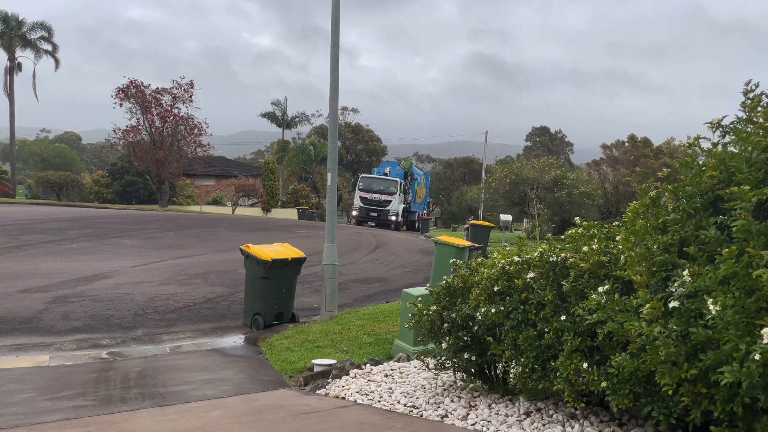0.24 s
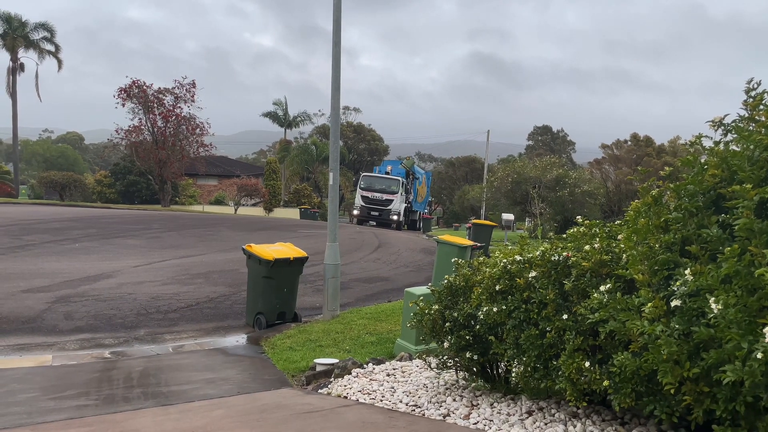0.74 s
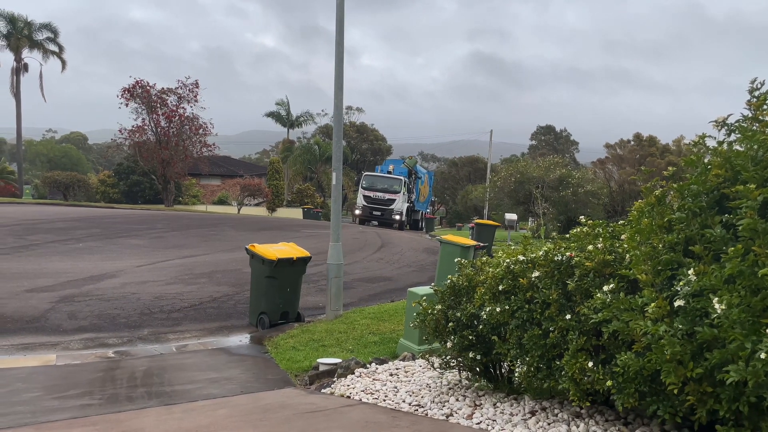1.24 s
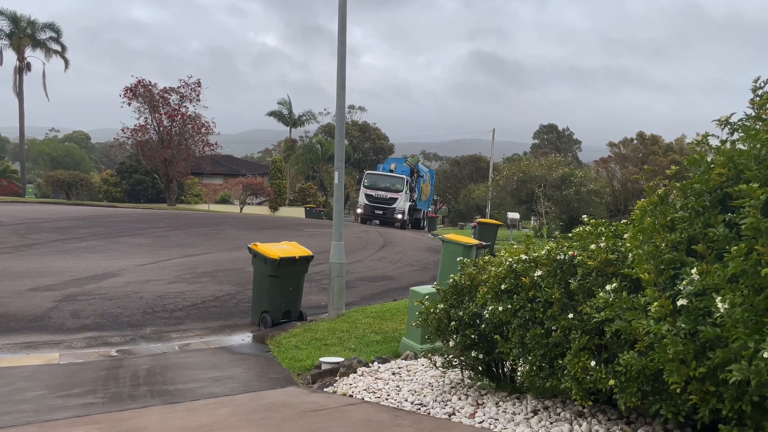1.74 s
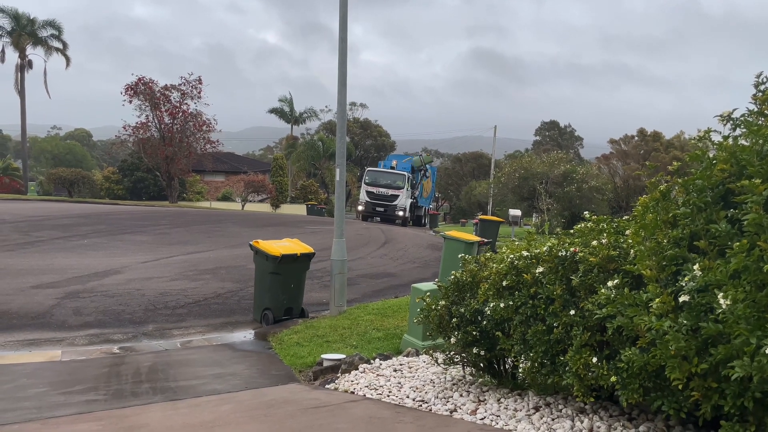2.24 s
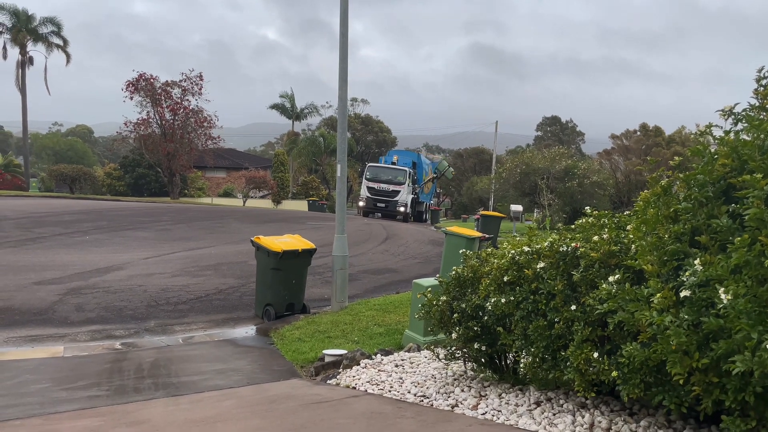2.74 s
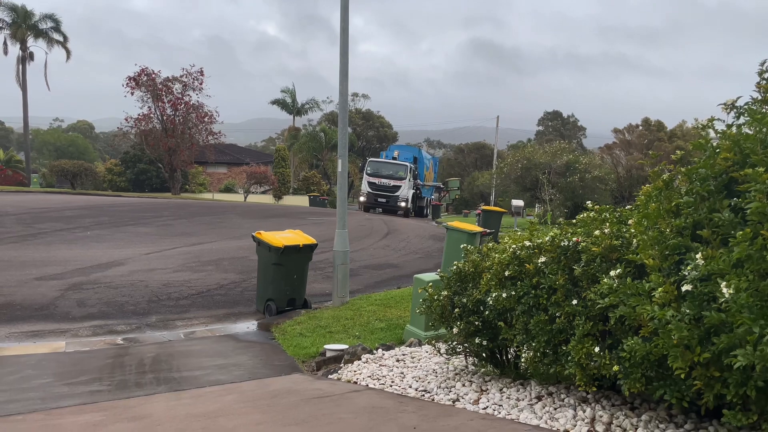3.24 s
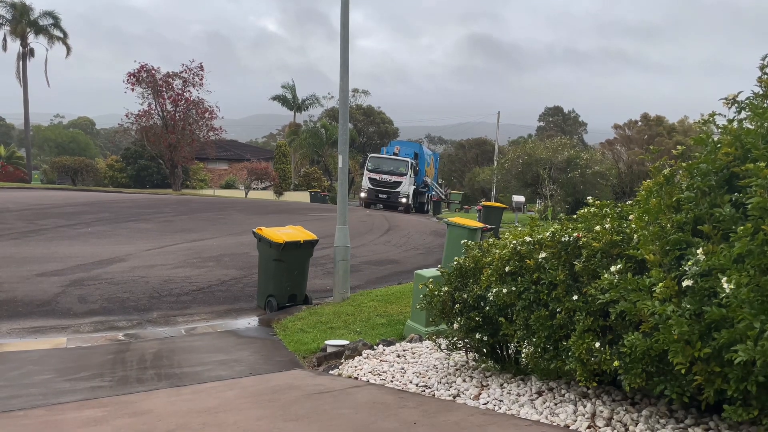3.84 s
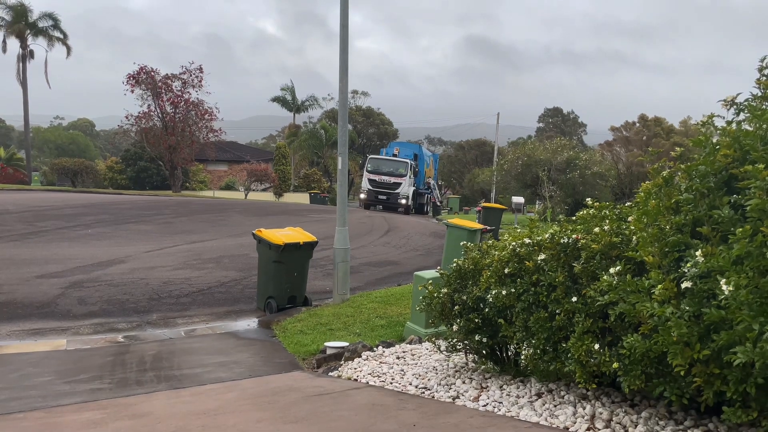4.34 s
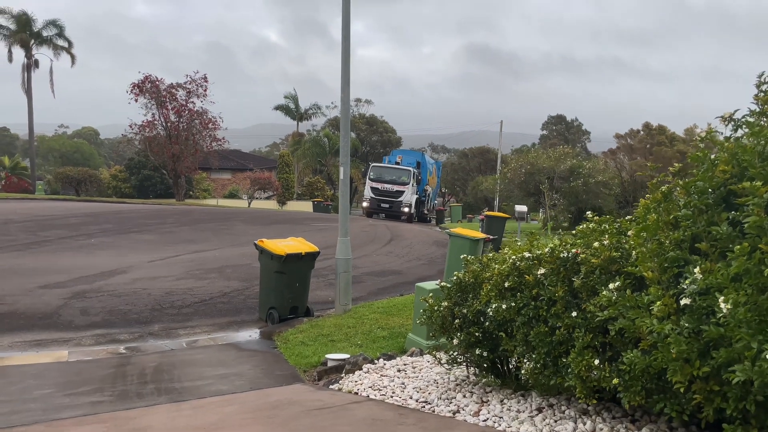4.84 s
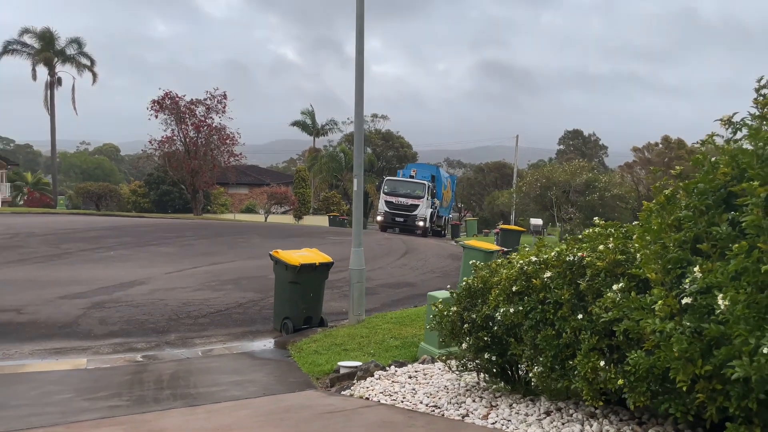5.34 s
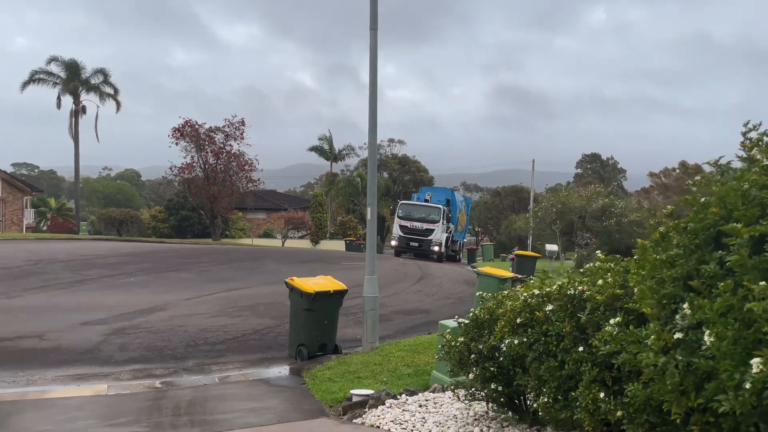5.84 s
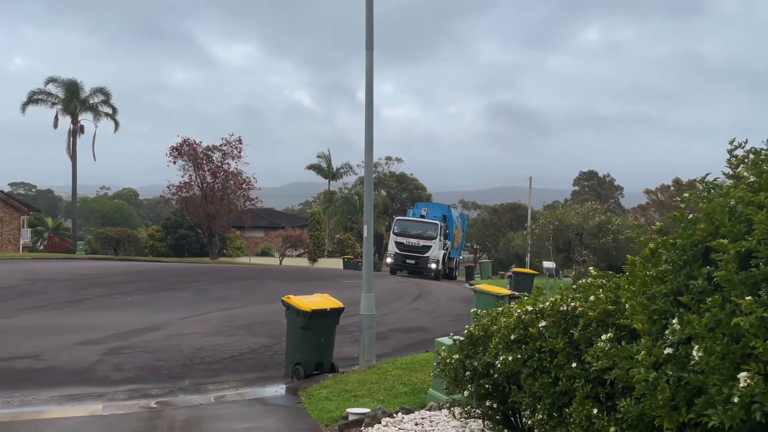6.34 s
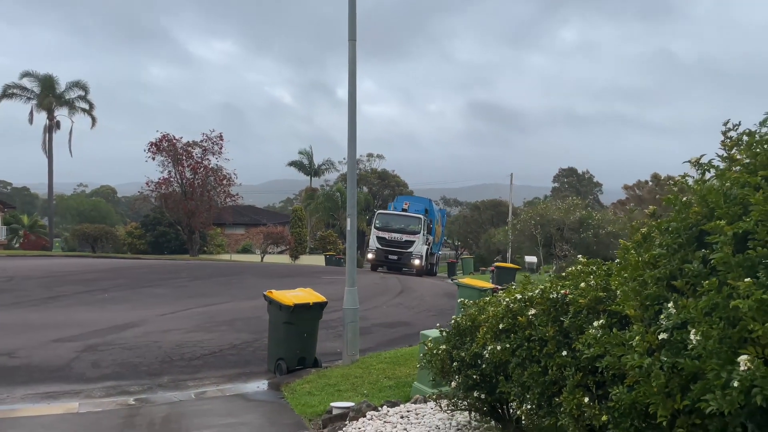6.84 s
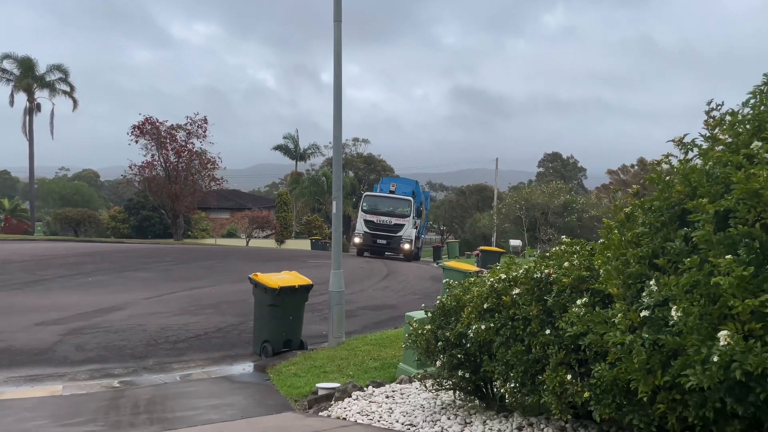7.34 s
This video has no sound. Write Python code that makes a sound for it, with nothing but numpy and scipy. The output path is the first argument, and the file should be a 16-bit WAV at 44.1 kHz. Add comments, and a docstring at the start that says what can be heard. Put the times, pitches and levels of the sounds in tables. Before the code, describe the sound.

A six-cylinder diesel truck slows to a rough idle, metal arm rattling and knocking against a bin with a high dry squeal around one second. A low hydraulic drone runs under the idle for three seconds, then thuds mark the end of the lift. Revs climb steadily, louder and harsher, with thin gear whines and wet tyre hiss, as a bird chirps rapidly. Phone microphone in open air by houses.

```python
"""A damp street with houses: a six-cylinder diesel refuse truck drops to idle, its arm clanks, squeaks and drives
the hydraulic pump, then it pulls away with rising revs while a bird calls. Beating noise makes the engine, sines
its firing orders, pump and whines, decaying noise and modes the knocks, gliding sines the bird.
A phone with two ports listens near a house wall."""
import sys
import numpy as np
from scipy import signal
from scipy.fft import rfft, irfft, next_fast_len
from scipy.io import wavfile
from scipy.ndimage import uniform_filter1d, map_coordinates

SR = 44100
rng = np.random.default_rng(int(sys.argv[2]) if len(sys.argv) > 2 else 0)


def to_wav(sig):
    """Store sig (one row per channel, or 1-D mono) as 16-bit WAV at the path in sys.argv[1].

    Samples outside -1..1 are clipped; the rate is SR.
    """
    pcm = np.clip(np.atleast_2d(sig), -1, 1) * 32767
    pcm = np.round(pcm).astype(np.int16)
    wavfile.write(sys.argv[1], SR, pcm.T)  # frames by channels


N = 335160

# Engine speed. Each row: time in s, firings per s.
FIRING = [(0, 59.5), (.2, 57.5), (.42, 46), (.75, 42.3), (1.4, 42.8), (4.08, 42.5), (4.4, 55.3), (4.57, 59),
          (4.82, 63), (5.06, 66.2), (5.9, 78.5), (6.1, 78), (6.5, 78.4), (6.75, 80), (7.3, 85.2),
          (7.6, 87.3)]
# Effort and nearness. Each row: time in s, exhaust roar in dB, air rush in dB,
# exhaust note over its mean in dB, block clatter in dB.
ROAR = [(0, -29, -42, -1, -33), (.21, -33, -43.5, 0.5, -37), (.36, -32, -46, -3.5, -37),
        (.78, -33.5, -43, 1.5, -36), (1.29, -37, -45, 4.5, -36.5), (2.1, -38.5, -48.5, 3.5, -38.5),
        (2.77, -36.5, -48, 3.5, -38), (4.09, -36, -46, 2.5, -38), (4.32, -32, -42.5, 1.5, -33.5),
        (4.89, -28.5, -40.5, -1, -35), (5.33, -27, -37.5, -1, -34.5), (5.7, -26.5, -37.5, -2.5, -35.5),
        (5.9, -25.5, -35.5, 0.5, -34.5), (6.2, -24.5, -37.5, -1, -33.5), (6.77, -24, -35, -0.5, -34.5),
        (7.03, -22, -36.5, 1, -32.5), (7.47, -20, -35.5, -3, -30.5), (7.6, -21, -36.5, 3, -31)]
# Arm and bin contacts. Each row: start in s, drive to frame in dB, to small steel in dB, to bin in dB,
# time for the rattle to fall 24 dB in s, frequency near which the frame is struck in Hz.
CONTACTS = [(.358, -37, -50, -47, .02, 1080), (.37, -34, -44, -31, 0.04, 1290),
            (0.467, -41, -50, -37, 0.06, 1620), (.533, -46, -44, -50, .012, 2190),
            (0.582, -40, -56, -22, 0.024, 1620), (.6, -42, -59, -20, .1, 1105),
            (.674, -58, -53, -26, .037, 2570), (0.839, -46, -36, -30, 0.07, 1090),
            (.848, -38, -34, -40, .05, 2170), (0.854, -28, -31, -21, 0.091, 1550),
            (.91, -42, -38.5, -25, 0.13, 2190), (1.322, -52, -43, -35, .09, 2540),
            (1.672, -43, -44.5, -48, 0.2, 2500), (3.35, -48, -46, -45, 0.13, 2200),
            (4.147, -34.5, -58, -28, 0.073, 1610), (4.258, -45, -54, -29.5, .1, 1105)]
# Arm frame modes. Each row: centre in Hz, width in Hz, gain of each of two passes in dB.
FRAME_MODES = [(1078, 340, 3), (1310, 77, 8), (1638, 390, 4.5), (2170, 300, 4.5), (2610, 260, 2.5)]


def amp(db):
    """Amplitude factor of a level in dB."""
    return 10 ** (np.asarray(db) / 20)


def unit(x):
    """x scaled to rms 1."""
    return x / np.sqrt(np.mean(x ** 2) + 1e-20)


def along(points, hz):
    """Columns of (Hz, value, ..) points on a log axis."""
    f, *cols = np.transpose(points)
    return np.squeeze([np.interp(np.log(hz + 1), np.log(f + 1), c) for c in cols])


def curves(rows):
    """One value per sample for each column after the time."""
    s, *cols = np.transpose(rows)
    return [np.interp(np.arange(N) / SR, s, c) for c in cols]


def wobble(rate, size=N):
    """A smooth random curve, rate knots a second."""
    at = np.arange(0, size + 8, 8)
    knots = rng.standard_normal(int(size * rate / SR) + 4)
    return np.interp(np.arange(size), at, map_coordinates(knots, [at * rate / SR]))


def gate(start, end, edge):
    """Opens at start, shuts at end, each over edge seconds."""
    s = np.arange(N) / SR
    return np.clip(np.minimum(s - start, end - s) / edge, 0, 1)


def add(track, s, sound):
    """Mixes a short sound in at time s."""
    part = track[round(s * SR):][:len(sound)]
    part += sound[:len(part)]


def filtered(x, response):
    """x times a complex response of frequency."""
    m = next_fast_len(x.shape[-1] + SR // 4)
    spectrum = rfft(x, m) * response(np.fft.rfftfreq(m, 1 / SR))
    return irfft(spectrum, m)[..., :x.shape[-1]]


def resonances(modes):
    """Response of a body with (Hz, width Hz, dB) modes of alternating sign."""
    def response(f):
        return sum((-1) ** k * amp(db) * 1j * f * w / (c * c - f * f + 1j * f * w)
                   for k, (c, w, db) in enumerate(modes))
    return response


def through_body(x, modes):
    """x after two passes through the modes."""
    return filtered(x, lambda f: resonances(modes)(f) ** 2)


def shaped(x, points):
    """x with a spectrum through (Hz, dB) points."""
    return filtered(x, lambda f: amp(along(points, f)))


def noise(patchy_db):
    """White noise with drifting patches of gain, as gusty air makes of a far sound."""
    z = signal.stft(rng.standard_normal(N), nperseg=512)[2]
    across_hz = uniform_filter1d(rng.standard_normal(z.shape), 5, axis=0)
    field = uniform_filter1d(across_hz, 12, axis=1)
    return signal.istft(z * amp(patchy_db * unit(field)), nperseg=512)[1][:N]


def glides(rows, edge):
    """Sliding sines with soft ends: rows of (s, from Hz, to Hz, length s, dB)."""
    out = np.zeros(N)
    for s, from_hz, to_hz, length, db in rows:
        u = np.linspace(0, 1, round(length * SR))
        shape = np.clip(np.minimum(u, 1 - u) / edge, 0, 1)
        hz = from_hz + (to_hz - from_hz) * u
        add(out, s, np.sqrt(2) * amp(db) * shape * np.sin(2 * np.pi * np.cumsum(hz) / SR))
    return out


def blurred(hz, width_hz, size=N, steady=0):
    """A tone smeared into a narrow band of noise round a steady core, rms 1."""
    turn = 2 * np.pi * np.cumsum(hz * np.ones(size)) / SR
    in_phase = (steady + wobble(width_hz, size=size)) * np.sin(turn)
    return unit(in_phase + wobble(width_hz, size=size) * np.cos(turn))


def bird():
    """Each syllable is a thin rising whistle that swells in a slur and a higher flick."""
    # Each row: slur start in s, slur level in dB, flick level in dB.
    syllables = [(5.928, -44, -28), (6.048, -36, -40), (6.151, -38, -36), (6.27, -35, -40),
                 (6.393, -33, -42), (6.514, -29.5, -38), (6.638, -33, -42), (6.763, -30, -41),
                 (6.893, -32, -46), (7.021, -29, -44), (7.148, -30, -43), (7.276, -27, -39),
                 (7.408, -31, -41), (7.54, -31, -46)]
    # from Hz, to Hz, length s
    sweep, slur, flick = (1250, 2700, .062), (1520, 2000, .014), (2190, 2380, .019)
    sweep_before_s, flick_after_s, sweep_db = .024, .014, -46
    rows = []
    for s, slur_db, flick_db in syllables:
        rows.append((s - sweep_before_s, *sweep, sweep_db))
        rows.append((s, *slur, slur_db))
        rows.append((s + flick_after_s, *flick, flick_db))
    return glides(rows, edge=0.35)


def rolling():
    """Tyres hiss on the damp road: shaped noise that rises as the truck gathers speed."""
    # Each row: frequency in Hz, level in dB per Hz.
    tyre_spectrum = [(500, -19), (800, -70), (1400, 14), (2000, 7), (3000, -25), (5000, -44.5)]
    pull_away_s, final_db, rise_db, rise_s = 4.22, -33, 17, 1
    since = np.maximum(np.arange(N) / SR - pull_away_s, 0)
    tyre_db = final_db - rise_db * np.exp(-since / rise_s)
    return amp(tyre_db) * unit(shaped(noise(2.7), tyre_spectrum))


def pump():
    """Oil pulses of the gear pump, harmonics heard while a stroke of the arm loads it."""
    # Each row: start in s, end in s, level in dB.
    strokes = [(0.793, 1.55, -33.5), (1.592, 3.337, -33), (3.348, 3.654, -37), (3.666, 4.234, -31)]
    # Each row: multiple of the pump pitch, mean level re stroke in dB.
    pump_orders = [(1, -1), (1.5, -18), (2, -14.5), (3, -17.5), (4, -27), (5.52, -23), (6.02, -24)]
    running_hz, starts_lower_hz, spin_up_s, valve_travel_s = 142.7, 12, .15, 0.025
    since = np.maximum(np.arange(N) / SR - strokes[0][0], 0)
    hz = running_hz - starts_lower_hz * np.exp(-(since / spin_up_s) ** 2) + 0.673 * wobble(5)
    turn = 2 * np.pi * np.cumsum(hz) / SR
    engaged = sum(amp(db) * gate(a, b, valve_travel_s) for a, b, db in strokes)
    pulses = 0
    for k, level_db in pump_orders:
        waver_db = (1.0 + 0.57 * k) * wobble(10 + 3.5 * k)
        pulses = pulses + amp(level_db + waver_db) * np.sin(k * turn)
    return engaged * np.sqrt(2) * pulses


def gears():
    """Short tooth-mesh whines: sliding sines that waver together in level."""
    # Each row: start in s, end in s, start pitch in Hz, end pitch in Hz, level in dB, waver in dB.
    whines = [(0, 0.203, 1565, 1562, -44, 4.5), (4.882, 5.098, 1966, 2030, -48.5, 1),
              (5.05, 5.22, 1156, 1156, -40.5, 3.7), (5.438, 5.709, 1648, 1720, -42.5, 2.5),
              (6.298, 6.547, 2050, 2160, -42, 2.5), (6.74, 7.027, 2104, 2190, -47, 4),
              (4.88, 5.36, 3835, 3870, -54, 5), (5.86, 6.4, 4470, 4480, -53.5, 3),
              (6.56, 6.66, 4030, 4240, -51.5, 3), (6.65, 6.78, 4220, 4260, -52, 3),
              (7.03, 7.197, 1133, 1158, -37, 3)]
    waver = wobble(45)
    return sum(amp(waver_db * waver) * glides([(a, from_hz, to_hz, b - a, db)], edge=0.14)
               for a, b, from_hz, to_hz, db, waver_db in whines)


def gearbox():
    """A tooth-mesh whine locked to the revs under load, and thin whines that stay put."""
    # Each row: time in s, mesh whine level in dB.
    mesh_level = [(4.3, -62), (5.4, -50), (5.48, -39), (5.6, -40), (5.7, -45), (6.05, -42), (6.15, -46),
                  (6.45, -40), (6.7, -46), (6.85, -40), (7.17, -37), (7.25, -45), (7.4, -40), (7.6, -40)]
    # Thin steady whines. Each row: centre in Hz, level re block clatter in dB.
    strands = [(550, -25), (1077, -15.5), (1150, -15), (1556, -23), (1632, -24), (2137, -19), (2595, -25.5)]
    teeth_per_firing = 23
    (rate,), (mesh_db,), block_db = curves(FIRING), curves(mesh_level), curves(ROAR)[3]
    fixed_whines = sum(amp(db) * blurred(hz, width_hz=14, steady=0.67) for hz, db in strands)
    mesh = blurred(teeth_per_firing * rate, width_hz=35, steady=2.2)
    return amp(mesh_db) * mesh + amp(block_db) * fixed_whines


def panel():
    """Engine shake under load makes one cab sheet sing, a little sharper when louder."""
    # Each row: time in s, mean level in dB.
    panel_level = [(4.1, -51), (4.25, -44), (4.45, -46.5), (4.64, -37), (4.78, -50), (4.92, -32),
                   (5.05, -42.5), (5.42, -39.5), (5.5, -48.5), (5.66, -39), (5.74, -50.5), (6.06, -36),
                   (6.15, -51), (6.45, -38), (6.57, -45.5), (6.6, -31), (6.77, -31), (6.82, -35),
                   (6.95, -38), (7.15, -35), (7.3, -28.5), (7.4, -32), (7.6, -30.5)]
    mean_hz, bend_hz_per_db = 1073, .9
    db, = curves(panel_level)
    hz = mean_hz + bend_hz_per_db * (db - db.mean()) + 1.2 * wobble(20)
    tone = np.sqrt(2) * np.sin(2 * np.pi * np.cumsum(hz) / SR) * amp(0.36 * wobble(60))
    return gate(panel_level[0][0], N, 0.091) * amp(db) * tone


def pivot():
    """Stick-slip of a dry pivot: hard start, held body, quick stop; overtones are rougher and sag sooner."""
    # Each row: start in s, pitch in Hz, level in dB, held time in s, unsteadiness in Hz.
    squeaks = [(.585, 3710, -52.5, .059, 170), (.672, 3550, -44, .029, 170), (.998, 3960, -29, .05, 140),
               (.999, 3560, -37, .02, 250), (1.02, 3720, -45, .035, 300), (1.066, 3980, -36, .025, 170),
               (1.09, 4000, -41.5, .03, 170), (1.146, 4350, -44, .016, 200), (1.147, 4010, -42, .025, 150),
               (1.172, 3710, -40.5, .097, 220), (1.18, 4000, -46, .09, 150), (6.16, 6200, -50, .055, 600)]
    # Each row: multiple of the pitch, level in dB.
    overtones = [(1, -3), (2.05, -15.5), (2.82, -19)]
    sag_db_per_s, stop_db_per_s, core_over_blur = 60, 700, 1.4
    out, t = np.zeros(N), np.arange(SR // 4) / SR
    attack = 1 - np.exp(-t / 0.0017)
    for s, hz, db, held_s, width_hz in squeaks:
        for k, level_db in overtones:
            fade_db = -sag_db_per_s * k * t - stop_db_per_s * np.maximum(t - held_s, 0)
            tone = blurred(k * hz, width_hz * k, size=len(t), steady=core_over_blur / k)
            add(out, s, amp(db + level_db + fade_db) * attack * tone)
    return out


def arm():
    """Each contact knocks the frame, rattles small steel parts and thumps the hollow bin."""
    # Pins and links. Each row: centre in Hz, width in Hz, gain of each of two passes in dB.
    steel_modes = [(3380, 540, 4), (3930, 340, 3.5), (4390, 240, 2.5), (5320, 450, 1), (6660, 1600, -2.5),
                   (9500, 2500, -4), (11550, 3700, -8)]
    # Hollow plastic. Each row: frequency in Hz, mean level re thud in dB, t60 in s.
    bin_modes = [(121.6, 4.5, 0.11), (233, 0, 0.1), (340, 4, 0.042)]
    crack_over_rattle_db, crack_t60_s = 8.5, 0.011
    frame, steel, thuds = np.zeros(N), np.zeros(N), np.zeros(N)
    t = np.arange(SR // 4) / SR
    for s, frame_db, steel_db, thud_db, rattle_s, _ in CONTACTS:
        crack = amp(crack_over_rattle_db - 60 * t / crack_t60_s)  # a hard contact
        rattle = amp(-24 * t / rattle_s)  # then loose parts
        envelope = (crack + rattle) * (1 - np.exp(-t / 0.00098))
        blow = envelope * amp(1.2 * wobble(310, size=len(t))) * rng.standard_normal(len(t))
        add(frame, s, amp(frame_db) * blow)
        add(steel, s, amp(steel_db) * blow)
        thud = sum(amp(db + rng.normal(0, 1) - 60 * t / t60) * np.sin(2 * np.pi * hz * t)
                   for hz, db, t60 in bin_modes)
        add(thuds, s, amp(thud_db) * thud * (1 - np.exp(-t / 0.0054)))
    knocks = amp(7.0) * through_body(frame, FRAME_MODES)
    rattles = amp(8.0) * through_body(steel, steel_modes)
    return knocks + rattles + thuds


def clangs():
    """The frame rings on after each contact, most in the modes next to the struck one; dry ticks have no ring."""
    # Each row: start in s, drive before its band filter in dB, centre in Hz, width in Hz.
    ticks = [(.367, -20, 4300, 1800), (.52, -33, 11500, 5000), (.532, -24, 3500, 5500),
             (3.344, -23, 4200, 3300)]
    ring_over_blow_db, ring_t60_s, off_mode_db_per_octave, tick_t60_s = 8.5, 0.079, 39, .02
    out, t = np.zeros(N), np.arange(SR // 4) / SR
    attack = 1 - np.exp(-t / 0.0017)
    for s, frame_db, *_, struck_hz in CONTACTS:
        ring = 0
        for hz, _, _ in FRAME_MODES:
            mode_db = rng.normal(0, 2.5) - off_mode_db_per_octave * abs(np.log2(hz / struck_hz))
            ring = ring + amp(mode_db) * np.sin(2 * np.pi * hz * rng.normal(1, 0.012) * t)
        decay = amp(frame_db + ring_over_blow_db - 60 * t / ring_t60_s)
        add(out, s, np.sqrt(2) * decay * attack * ring)
    for s, db, hz, width_hz in ticks:
        puff = amp(db - 60 * t / tick_t60_s) * (1 - np.exp(-t / 0.00073)) * rng.standard_normal(len(t))
        add(out, s, through_body(puff, [(hz, width_hz, 0)]))
    return out


def note():
    """Clean firing orders through the pipe; cylinders differ, so weaker unsteady orders lie between them."""
    # Each row: multiple of firing, level in dB, dB gained per dB of roar, waver in dB, wavers per s.
    firing_orders = [(1, 1.7, -0.08, -0.5, 9.3), (2, -4.5, 0.34, 3, 12), (3, -15.5, .5, 1.1, 13)]
    # Each row: multiple of firing, mean level re exhaust roar in dB.
    uneven_orders = [(0.58, -42), (4 / 3, -19), (1.5, -22), (5 / 3, -20.5), (8 / 3, -17), (10 / 3, -14),
                     (4, -23), (14 / 3, -22), (6, -26.5), (19 / 3, -26)]
    # Exhaust pipe as the orders sweep through it. Each row: frequency in Hz, gain in dB.
    pipe = [(42, -43), (49, -29), (54, -31.5), (59, -18.5), (63, -15), (67, -18), (71, -22.5), (79, -22),
            (83, -24.5), (86, -41), (106, -31), (118, -44), (133, -30), (146, -31.5), (157, -29.5),
            (164, -27.5), (176, -28.5), (188, -47), (200, -18.5), (220, -17), (245, -17), (265, -20)]
    rate, = curves(FIRING)
    exhaust_db, _, note_db, _ = curves(ROAR)
    effort_db = exhaust_db - exhaust_db.min()
    turn = 2 * np.pi * np.cumsum(rate) / SR

    def tone(k, db):
        return np.sqrt(2) * amp(db) * np.sin(k * turn + rng.uniform(0, 2 * np.pi))

    out = np.zeros(N)
    for k, db, grows, waver_db, speed in firing_orders:
        pipe_db = along(pipe, k * rate)
        out += tone(k, note_db + db + grows * effort_db + pipe_db + waver_db * wobble(speed))
    for k, db in uneven_orders:
        out += tone(k, exhaust_db + db + 4.6 * wobble(6.4))
    return out


def engine():
    """Exhaust roar, cab boom, block clatter, air rush and valve ticks: noise beating with firing and crank."""
    # Each row: frequency in Hz, level in dB per Hz.
    exhaust_spectrum = [(25, -43), (45, -17.5), (70, -1.5), (120, -2.5), (190, -3.5), (260, -3),
                        (400, -7.5), (700, -15), (1400, -26), (2500, -52)]
    # Each row: frequency in Hz, level in dB per Hz.
    air_spectrum = [(1200, -6), (2300, -5.5), (2900, -4), (3350, -1.5), (3850, -1), (4250, -6),
                    (4500, -4.5), (4800, -7), (5300, -5.5), (6100, -11), (7600, -13.5), (8400, -19.5),
                    (11000, -21), (12000, -32), (12900, -51), (14400, -43), (15100, -35), (15700, -37)]
    # Block, cab and valve gear modes. Each row: centre in Hz, width in Hz, gain of each of two passes in dB.
    block_modes = [(788.5, 25, -10.5), (1067, 47, 4), (1106.4, 308, -1), (1309, 167, -6), (1550, 32, -4),
                   (1651, 117, -3), (1759, 106, -5), (1920, 98, -6.5), (2110, 104, -5.5),
                   (2610, 244, -11.5)]
    cab_modes = [(339, 22.4, 1.5), (457, 80, -3.5)]
    valve_modes = [(3720, 750, 4), (6860, 720, 0)]
    # Each row: time in s, valve tick level in dB.
    valve_level = [(0, -55.5), (4.75, -55), (5.0, -48), (5.3, -44.5), (5.42, -50), (5.8, -47), (5.96, -53),
                   (6.06, -46), (6.24, -53), (7.6, -51)]
    cab_re_roar_db, cab_start_s, cab_build_s = -14.5, 4.36, .4
    firing_swell_db, half_beat_db = 2, 2.2  # block clatter: each firing, every second one
    rate, = curves(FIRING)
    exhaust_db, air_db, _, block_db = curves(ROAR)
    turn = 2 * np.pi * np.cumsum(rate) / SR
    firing = np.cos(turn)
    crank = 0.25 * np.cos(turn / 3) + 0.64 * np.cos(turn / 2 + 2.95) + 0.12 * np.cos(turn * 2 / 3 + 2.0)

    puffs = noise(1.0) * amp(1.35 * firing)
    exhaust = unit(shaped(puffs, exhaust_spectrum))
    cab = amp(cab_re_roar_db) * unit(through_body(puffs, cab_modes))
    cab = gate(cab_start_s, N, cab_build_s) * cab

    clatter_db = firing_swell_db * firing + half_beat_db * np.cos(turn / 2) + 2.1 * crank
    block = unit(through_body(noise(0.5) * amp(clatter_db), block_modes))
    rush_db = 0.15 * firing + 1.0 * crank + 0.68 * wobble(8)
    air = unit(shaped(noise(1.9) * amp(rush_db), air_spectrum))

    # valve gear ticks once a crank turn into two bright modes
    tick = amp(5.6 * np.cos(turn / 3 + 1.33 * wobble(5.0))) * rng.standard_normal(N)
    valves = amp(curves(valve_level)[0]) * unit(through_body(tick, valve_modes))
    return valves + amp(exhaust_db) * (exhaust + cab) + amp(block_db) * block + amp(air_db) * air


def truck():
    """Engine, wheels and arm."""
    return engine() + rolling() + arm() + pivot()


def ports(direct, scattered):
    """Each port mixes the direct and the scattered sound with its own phase and shading."""
    # Each row: frequency in Hz, likeness of the ports 0-1, lead of left in radians, left over right in dB.
    port_pair = [(30, .985, 0, 2.6), (100, .98, 0, 1.8), (170, .93, -.25, 2.6), (300, .9, -.15, 2.5),
                 (650, .3, -.2, 4.5), (1100, .7, 0, 5), (1500, .3, 2, 4), (2000, .55, 2.5, -1),
                 (2800, .35, -1.2, -1), (3700, .78, 0, -1), (5500, .4, -1, 1), (6000, .25, 1.2, 2),
                 (7000, .65, .5, -1.5), (7800, .15, .6, 5), (8400, .7, 3.0, 1), (8900, .88, 3.14, .5),
                 (9600, .65, 3.5, -1.5), (10100, .4, 5, 0), (10500, .93, 6.2, 0), (11000, 1, 6.28, 0),
                 (12700, 1, 6.28, 0), (13250, .25, 7.5, 0), (13900, 1, 9.42, 0)]

    def share(f, part):
        alike, lead, tilt_db = along(port_pair, f)
        side = np.array([[1], [-1]])
        mix = part(side * np.arccos(np.clip(alike, 0, 1)) / 2)
        return amp(side * tilt_db / 2) * np.exp(.5j * side * lead) * mix

    return filtered(direct, lambda f: share(f, np.cos)) + filtered(scattered, lambda f: share(f, np.sin))


def scene():
    """Houses and hedges return the truck's other sides, unrelated in detail; gear whines and bird arrive in step."""
    in_step = amp([[1.5], [-1.5]]) * gears() + amp([[-.5], [.5]]) * bird()
    direct = truck() + note() + panel() + pump() + gearbox() + clangs()
    return ports(direct, truck()) + in_step


def record(dry):
    """The phone keeps nothing above its band limit."""
    top_hz = 15700
    return filtered(dry, lambda f: f < top_hz)


dry = scene()
out = record(dry)
to_wav(out)
```